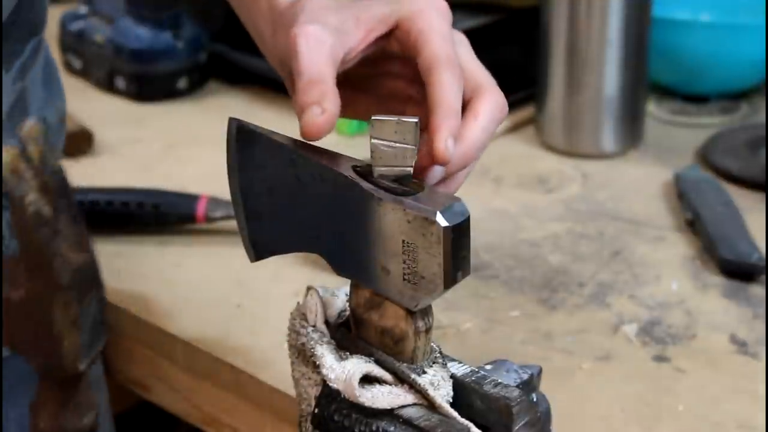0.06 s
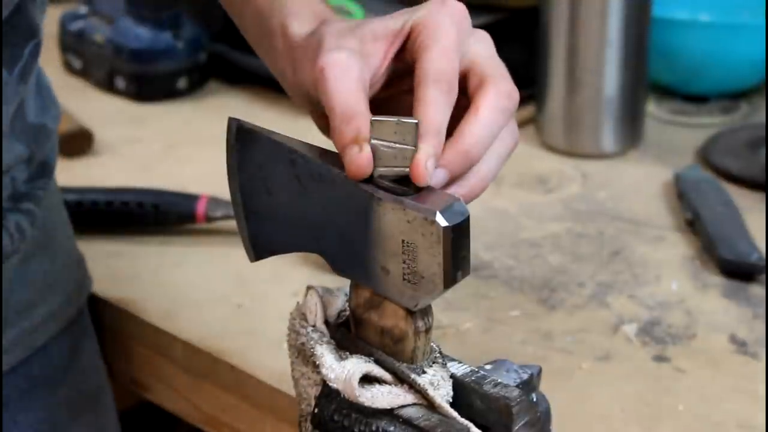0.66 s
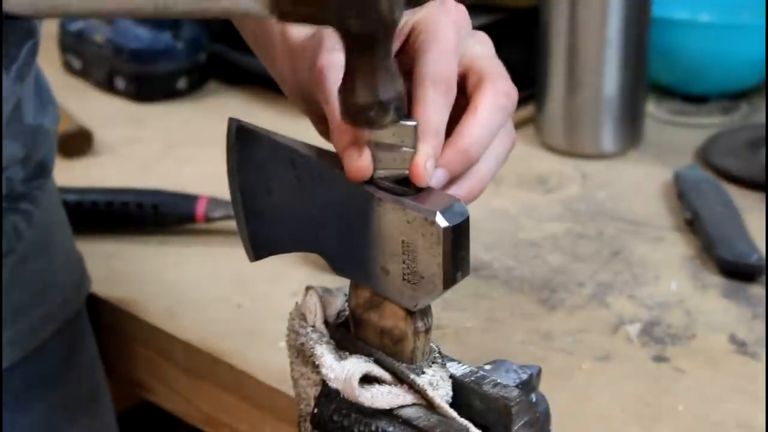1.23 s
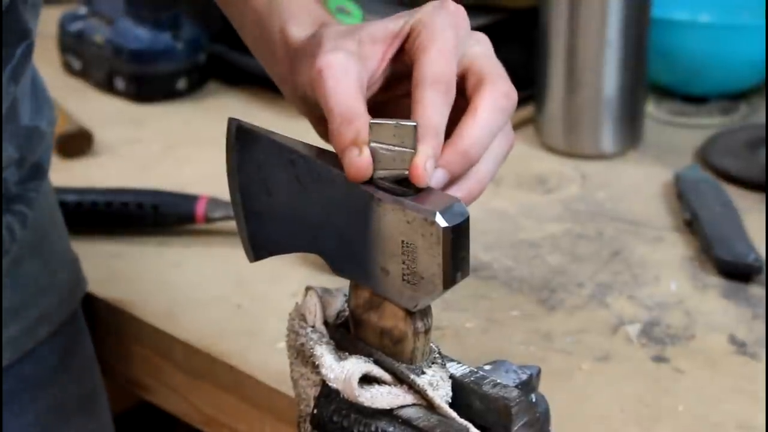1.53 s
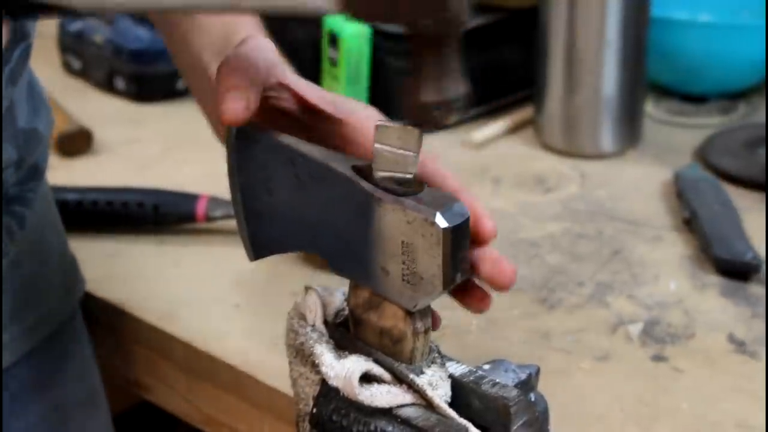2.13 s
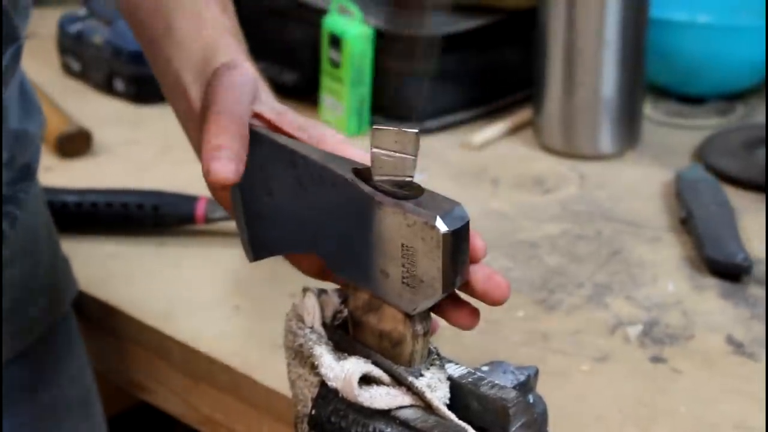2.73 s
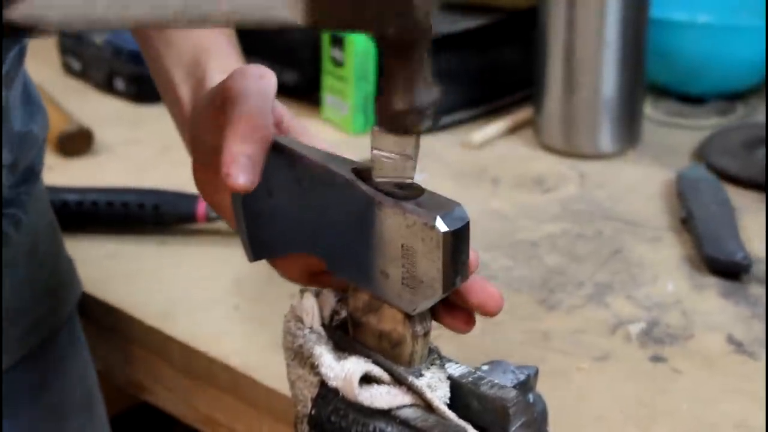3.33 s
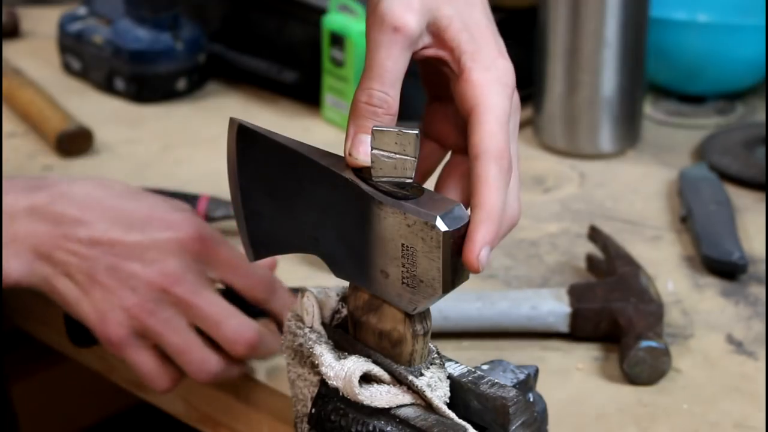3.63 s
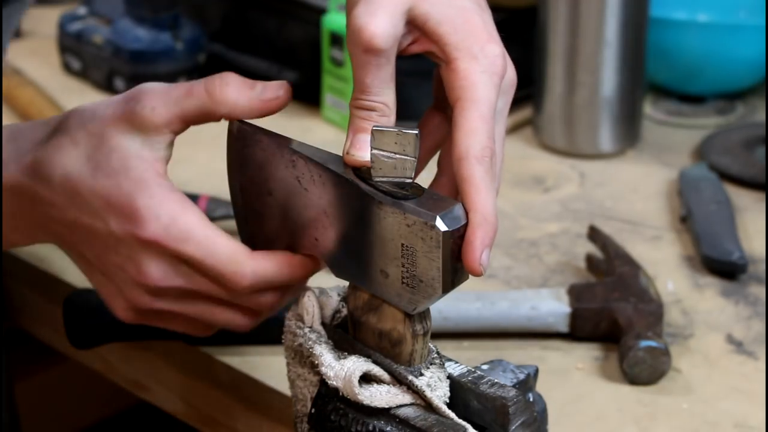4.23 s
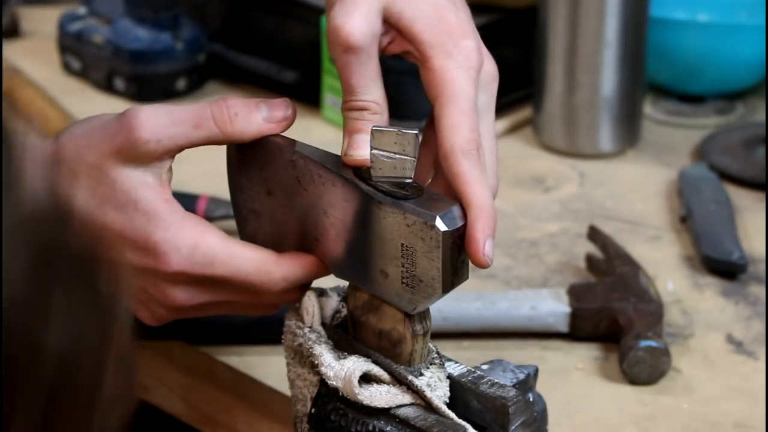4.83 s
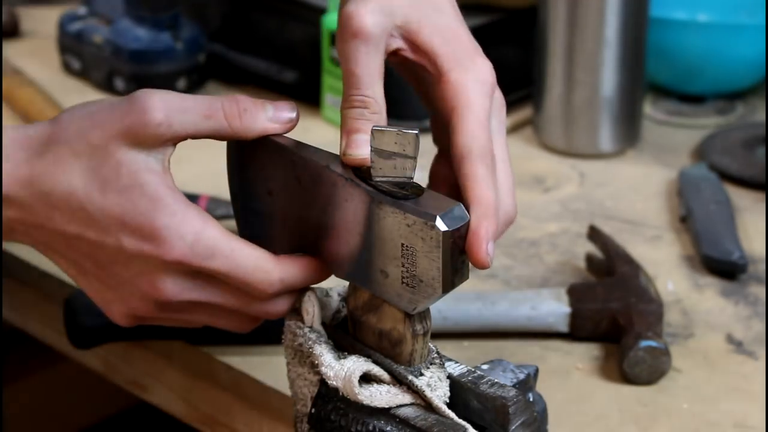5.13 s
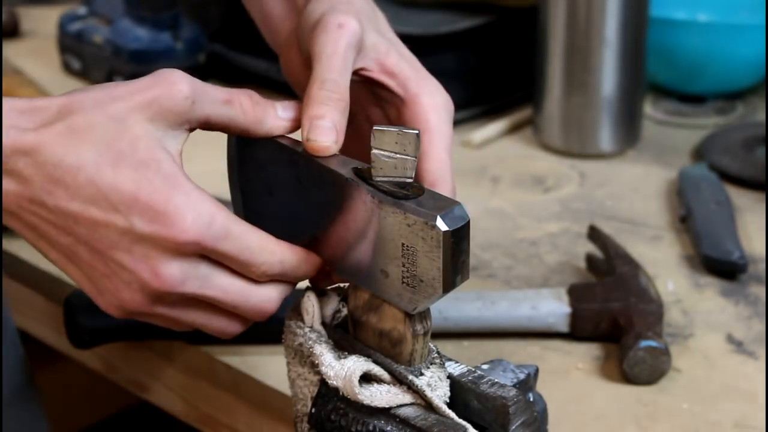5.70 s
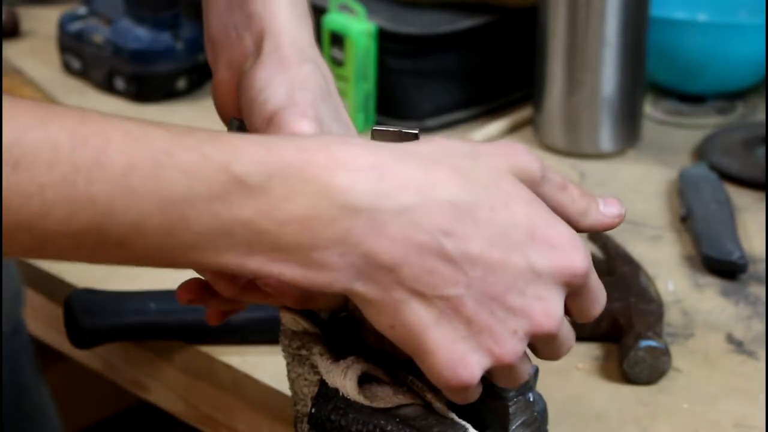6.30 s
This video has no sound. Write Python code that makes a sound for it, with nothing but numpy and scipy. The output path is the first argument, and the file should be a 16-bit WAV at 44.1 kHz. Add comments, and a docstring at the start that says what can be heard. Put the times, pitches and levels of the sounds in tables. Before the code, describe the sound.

Uneven metal-on-metal hammer strikes clack and ring in a workshop, followed by a wooden thud and a small metallic clink.

```python
"""A hammer drives a steel wedge into the handle of an axe held in a bench vise, in a hard-walled workshop.
Each blow clacks, rings the steel and thumps the bench; the first ones also split the wood.
Between the quick blows the ringing drops abruptly. The hammer falls on the bench and rocks to rest,
fingers tick on the axe head, and last the vise bar slides and clinks. Throughout, over a faint hiss,
a close microphone's limiter holds the loud hits down and lets the room swell after them."""
import sys
import numpy as np
from scipy import signal
from scipy.fft import rfft, irfft
from scipy.io import wavfile
from scipy.ndimage import uniform_filter1d, minimum_filter1d

SR = 44100
rng = np.random.default_rng(int(sys.argv[2]) if len(sys.argv) > 2 else 0)


def generate_wav(signal):
    """Clip the signal to [-1, 1] and save it as 16-bit WAV at the path in sys.argv[1]."""
    frames = np.transpose(np.atleast_2d(signal))
    scaled = np.clip(frames, -1, 1) * 32767
    pcm = np.round(scaled).astype(np.int16)
    wavfile.write(sys.argv[1], SR, pcm)


N = 280467
AGE_S = np.arange(SR) / SR  # time since a contact

# blows: (time [s], force [dB], ring re force [dB], clank re force [dB], clack tilt [dB/octave])
BLOWS = [(0.4773, 9.3, -33, -18, -0.48), (0.8741, 11, -17, -8, 7.8), (1.275, 8, -10, -8.5, 0.51),
         (1.6687, 3.5, -23, -4.5, 7), (1.8050, 3, -13.5, -5.5, -1.7), (1.9404, 7.5, -14, -3, 7.9),
         (2.0301, 17, -19, -7, 1.6), (2.1823, 14.5, -10.5, -1, 2), (2.2900, 13, -21, -6, -1.2),
         (2.4303, 21, -17, -4.5, -2.2), (2.8321, 22, -11.5, -7.5, 3), (3.2471, 4, -13.5, -1.5, 0.65),
         (3.3949, 7.1, -18, -6.5, 1.5)]
def hammer_blows(out, let_go_s=1.82, let_go_span_s=0.42, facing_db=-4.5):
    """The hammer seats the wedge; fingers steady and mute it, then let go."""
    for k, (s, force_db, ring_db, clank_db, tilt_db) in enumerate(BLOWS):
        grip = np.clip(.5 - (s - let_go_s) / let_go_span_s, 0, 1)
        contact, body = blow(force_db, ring_db, clank_db, tilt_db, grip, loose=np.exp(-k))
        room = workshop()  # the arm moves: new paths each blow
        # the wedge faces the microphone: weaker reflections
        facing = room * np.where(AGE_S < .005, 1, undb(facing_db))
        add(out, s, skip_decay(heard(contact, facing) + heard(body, room), s))


# instant of contact: (frequency [Hz], density [dB])
CRACK = [(600, 5.5), (1500, 3.5), (4000, 2), (8000, -5.5), (12000, 1.5), (16000, 4.5)]
# steel on steel: (frequency [Hz], density [dB])
CLACK = [(700, -2), (1500, -14), (2500, -7), (3500, -3), (5200, 0.5), (7000, 2.5), (8500, 1.5), (10000, -2),
         (11300, -1), (13000, -3.5), (16000, -17)]
def blow(force_db, ring_db, clank_db, tilt_db, grip, loose):
    """One blow as (contact, body); the hammer catches up with the sinking wedge and touches it twice."""
    crack = strength(burst(CRACK, t60_s=0.01, rise_s=.0001), force_db - 2.5 + 2.5 * loose)
    clack = strength(burst(CLACK, t60_s=0.049, rise_s=0.00031, tilt_db=tilt_db), force_db + 0.5)
    contact = crack + wedge(force_db + 4 - 8 * grip)
    rebound = undb(-7) * delay(contact, s=0.001153)
    head = axe_head(force_db + clank_db, force_db + ring_db)
    wood = handle_and_bench(force_db, loose)
    return contact + rebound, clack + head + delay(wood, s=0.002533)


# wedge modes: (frequency [Hz], level [dB], t60 [s])
WEDGE_MODES = [(8275, 2.5, 0.007), (7650, -8, .004), (8300, -4.5, 0.0014), (11880, -12.5, .003)]
def wedge(db, detune=.01):
    """The wedge rings, quickly damped by the wood, at a slightly new pitch each blow."""
    pitch = 1 + detune * rng.standard_normal()
    modes = [(hz * pitch, mode_db, t60_s) for hz, mode_db, t60_s in WEDGE_MODES]
    return strength(ring(modes, scatter_db=2), db)


# clank of the wedged head: (frequency [Hz], density [dB])
CLANK = [(1500, -27), (2600, -7.5), (3150, 4.5), (3500, -5), (3850, -9), (4450, 5), (5000, -31.5),
         (7000, -30.5)]
# hammer and axe modes: (frequency [Hz], level [dB], t60 [s])
STEEL_MODES = [(4377, -16.5, .45), (4610, -16, .5), (7291, -14, .35), (7639, -16, .3), (8511, 0, .34),
               (8534, -3, .25), (11222, -7, .28), (11246, -7, .22)]
def axe_head(clank_db, ring_db):
    """The head clanks briefly; the steel rings on."""
    clank = strength(burst(CLANK, t60_s=0.027, rise_s=0.0004), clank_db)
    return clank + undb(ring_db) * ring(STEEL_MODES, scatter_db=-4.0)


# splitting wood: (frequency [Hz], density [dB])
SPLIT = [(200, -14.5), (550, -4.5), (860, 11), (1200, -16), (2600, -12), (6000, -12.5), (15000, -21)]
# thud through vise and bench: (frequency [Hz], density [dB])
THUD = [(40, -9.5), (80, -7.5), (130, 3.5), (185, -2.5), (280, -1.5), (420, 3), (520, -5), (720, -6.5),
        (1100, -9.5), (1800, -14), (2500, -24.5), (5000, -47)]
# bench modes: (frequency [Hz], level [dB], t60 [s])
BENCH_MODES = [(34.2, 4, 0.54), (51.9, -6.5, 0.88), (92.6, -12.5, 0.13), (115.3, 0, 0.54),
               (133.6, -1, 0.15), (255.7, 2.5, 0.29), (281.3, 1, 0.21), (405, -2, 0.46), (418, -16, 0.29),
               (564, -4.5, 0.78), (675, -4.5, 0.054), (814.5, 4.5, 0.32)]
def handle_and_bench(force_db, loose):
    """A wedge not yet seated splits the wood; the push travels down the handle into the bench."""
    split = loose * strength(burst(SPLIT, t60_s=0.025, rise_s=.0005), force_db + 1.5)
    thud = strength(burst(THUD, t60_s=0.11, rise_s=0.002, tilt_db=0.18), force_db + 3.5)
    bench = undb(force_db - 20) * ring(BENCH_MODES, scatter_db=3)
    return split + thud + bench


# abrupt drops in the ringing: (time [s])
SKIPS_S = [1.755, 1.897, 1.997, 2.136, 2.256, 2.398, 3.336, 3.455]
def skip_decay(sound, onset_s, leap_s=.22):
    """At the first skip after its onset, a blow leaps to a later, quieter part of its decay."""
    later = [int((s - onset_s) * SR) for s in SKIPS_S if s > onset_s]
    if not later:
        return sound
    return np.hstack([sound[:, :later[0]], sound[:, later[0] + int(leap_s * SR):]])


# hammer landings: (time [s], body [dB], hard edge [dB])
LANDINGS = [(3.505, 17.5, 14.5), (3.516, 19, -3.5), (3.544, 0.5, -13), (3.562, 6.5, 14.5),
            (3.673, -17, -8.5)]
def dropped_hammer(out, room, rock_start_s=3.714, first_gap_s=.048, gap_ratio=.75):
    """The hammer bounces, then rocks to rest, each rocking contact sooner and weaker."""
    k = np.arange(6)
    gaps_s = first_gap_s * gap_ratio ** k
    times_s = rock_start_s + np.cumsum(gaps_s) - gaps_s
    rocking = zip(times_s, -4.5 - 4.5 * k, -7 - 5.5 * k)
    for s, body_db, edge_db in [*LANDINGS, *rocking]:
        add(out, s, heard(bounce(body_db, edge_db), room))


# bench-top modes: (frequency [Hz], level [dB], t60 [s])
BOARD_MODES = [(260, 1, 0.066), (295.5, 0, 0.071), (386, -3, 0.078), (473, -3, 0.05), (608, -2, 0.06),
               (710, -6, 0.04), (825, -4, 0.021), (1090, -2.5, 0.039)]
# hammer on wood: (frequency [Hz], density [dB])
KNOCK = [(40, -37), (110, -22), (300, 2), (600, 4.5), (1100, 2), (1600, -3), (2200, -7), (3200, -15),
         (5000, -23), (9000, -30.5), (15000, -47.5)]
def bounce(body_db, edge_db):
    """The board booms under a hard knock; gentle contacts are longer and duller."""
    board = ring(BOARD_MODES, scatter_db=1)
    gentle = np.clip((2 - body_db) / 10, 0, 1)
    knock = burst(KNOCK, t60_s=0.071 + 0.15 * gentle, rise_s=0.00027 + 0.0022 * gentle,
                  tilt_db=-1.5 * gentle)
    return strength(board, body_db) + strength(knock, edge_db)


# bar sliding to its stop: (time [s], level [dB], scrape t60 [s])
BAR_HITS = [(6.011, -21, 0.26), (6.022, -16.5, 0.048), (6.0259, -9, 0.043)]
# bar scrape: (frequency [Hz], density [dB])
SCRAPE = [(120, -56), (200, -26), (424, -26), (519, -18), (916, -20), (1370, -7.5), (2510, -19.5),
          (3900, -3), (4680, -4), (9230, -7.5), (10700, -16), (12600, -11), (16000, -22)]
# bar modes: (frequency [Hz], level [dB], t60 [s])
BAR_MODES = [(511, 3, 0.15), (1440, -7, 0.33), (3365, -9, 0.6), (3989, 4, 0.46), (5320, 3, 0.25),
             (7400, -5, 0.35), (9460, 2, 0.36), (9491, -7, 0.3)]
def vise_bar(out, room):
    """The loose steel bar scrapes and clinks in the vise screw."""
    for s, db, t60_s in BAR_HITS:
        clink = undb(db - 23) * ring(BAR_MODES, scatter_db=1)
        scrape = strength(burst(SCRAPE, t60_s, rise_s=0.00076), db)
        add(out, s, heard(scrape + clink, room))


# finger touches: (time [s], level [dB])
TOUCHES = [(3.903, -45), (3.984, -47), (4.082, -49.5), (4.182, -42.5), (4.243, -45), (4.382, -46)]
# finger on steel: (frequency [Hz], density [dB])
TICK = [(1000, -7), (3000, -11), (4500, -6), (5500, -4), (7200, -2), (10000, -8), (15000, -27)]
def finger_ticks(out, room):
    """Fingers tick on the axe head."""
    for s, db in TOUCHES:
        tick = strength(burst(TICK, t60_s=0.067, rise_s=0.00059), db)
        add(out, s, heard(tick, room))


# brushed axe-head modes: (frequency [Hz], level [dB], t60 [s])
PING_MODES = [(4350, -42, 0.15), (8830, -40.5, 0.16)]
def nail_ping(out, room, at_s=3.940):
    """A fingernail wakes two modes of the steel; the hand soon stills them."""
    ping = ring(PING_MODES, scatter_db=1) * attack(rise_s=.003)
    add(out, at_s, heard(ping, room))


# pushes on the bench: (time [s], level [dB])
NUDGES = [(0.019, -35), (0.299, -45), (4.619, -47.5), (5.609, -44)]
def bench_nudges(out, room):
    """A leaning body rocks only the lowest bench modes."""
    for s, db in NUDGES:
        sway = undb(db) * ring(BENCH_MODES[:3], scatter_db=0.5)
        add(out, s, heard(sway * fade(t60_s=0.48) * attack(rise_s=0.011), room))


# wall reverberation: (frequency [Hz], t60 [s], level [dB])
WALL_BANDS = [(60.4, 0.95, -0.5), (155, 0.29, 0.5), (400, 0.53, -2), (1024, 0.63, -3.5), (1900, 0.67, -3.5),
              (4150, 0.54, -9.5), (8800, 0.42, -10.5), (12000, 0.34, -12), (15800, 0.31, -18.5)]
# direct sound, left minus right: (frequency [Hz], level [dB])
BALANCE = [(500, 0), (2300, 2), (4200, 10.5), (8000, 1.5), (13000, -8.5)]
def workshop(walls_db=0, early_db=-7, left_lag_s=0.00011):
    """Response from bench to microphone: direct sound, bench-top reflections, then the walls."""
    hz, noise = bins(AGE_S), rfft(diffuse(SR))
    log_centres = np.log([row[0] for row in WALL_BANDS])
    walls = 0
    for (_, t60_s, db), share in zip(WALL_BANDS, np.eye(len(WALL_BANDS))):
        band = np.interp(np.log(hz + 1), log_centres, share)
        shape = fade(t60_s) * attack(rise_s=0.024)
        walls += undb(db) * irfft(noise * band, SR) * shape / np.linalg.norm(shape)
    shape = fade(t60_s=0.14) * (AGE_S > .001)
    early = undb(early_db) * diffuse(SR) * shape / np.linalg.norm(shape)
    lean_db = read(BALANCE, hz) / 2
    travel = np.exp(-2j * np.pi * hz * 12 / SR)
    left = undb(lean_db) * np.exp(-2j * np.pi * hz * left_lag_s)
    direct = irfft([travel * left, travel * undb(-lean_db)], SR)
    return direct * (AGE_S < .01) + early + undb(walls_db) * walls


# steady background: (frequency [Hz], density [dB])
HISS = [(15, -30.5), (25, 4), (64, -12.5), (107, -6), (160, -16), (281, -21.5), (313, -20), (631, -21),
        (684, -20.5), (1200, -25), (1570, -24), (2630, -27.5), (15500, -31)]
def hiss(rms_db=-48.5):
    """Faint hiss and rumble from all sides."""
    white = diffuse(N)
    noise = irfft(rfft(white) * undb(read(HISS, bins(white))), N)
    return undb(rms_db) * noise / noise.std()


def diffuse(size, port_gap_m=0.043):
    """Noise from all sides at two microphone ports: alike in the bass, unrelated in the treble."""
    mid, side = rng.standard_normal((2, size))
    alike = .985 * np.sinc(2 * bins(mid) * port_gap_m / 343)
    mid = rfft(mid) * np.sqrt((1 + alike) / 2)
    side = rfft(side) * np.sqrt((1 - alike) / 2)
    return irfft([mid + side, mid - side], size)


def burst(spectrum, t60_s, rise_s, tilt_db=0):
    """Countless heavily damped modes: a smooth spectrum, tilted per octave, smeared over a short decay."""
    hz = bins(AGE_S)
    phase = np.angle(rfft(rng.standard_normal(SR) * fade(t60_s) * attack(rise_s)))
    gain = undb(read(spectrum, hz) + tilt_db * np.log2(1 + hz / 100))
    return irfft(gain * np.exp(1j * phase), SR) * fade(min(4 * t60_s, .5))


def ring(modes, scatter_db):
    """Damped modes, weighted anew by each contact."""
    chance = rng.standard_normal((len(modes), 2))
    return sum(undb(db + scatter_db * a) * np.sign(b) * fade(t60_s) * np.sin(2 * np.pi * hz * AGE_S)
               for (hz, db, t60_s), (a, b) in zip(modes, chance))


def heard(x, room):
    """A contact at the two ports, gone within a second."""
    return signal.fftconvolve(x[None], room, axes=1)[:, :SR] * np.minimum(10 * (1 - AGE_S), 1)


def strength(x, db):
    """Scale a transient to the energy of 10 ms at this level."""
    return x * undb(db) / np.sqrt(np.sum(x ** 2) / (SR / 100))


def attack(rise_s):
    """Exponential rise."""
    return 1 - np.exp(-AGE_S / rise_s)


def fade(t60_s):
    """Exponential decay."""
    return np.exp(-np.log(1000) * AGE_S / t60_s)


def undb(db):
    """Decibels to gain."""
    return 10 ** (np.asarray(db) / 20)


def read(table, hz):
    """Interpolate levels over log frequency."""
    table_hz, db = np.array(table).T
    return np.interp(np.log(hz + 1e-3), np.log(table_hz), db)


def bins(x):
    """FFT frequencies of x in Hz."""
    return np.fft.rfftfreq(x.shape[-1], 1 / SR)


def delay(x, s):
    """Delay by s seconds."""
    return np.pad(x, (int(s * SR), 0))[:len(x)]


def add(out, s, sound):
    """Mix in a stereo sound at time s."""
    start = int(s * SR)
    out[:, start:start + sound.shape[1]] += sound[:, :N - start]


def scene():
    """All contacts in one room; sources nearer the microphone get weaker walls."""
    out = hiss()
    hammer_blows(out)
    dropped_hammer(out, workshop(walls_db=-6.5))
    room = workshop()
    finger_ticks(out, room)
    vise_bar(out, workshop(walls_db=-1))
    bench_nudges(out, room)
    nail_ping(out, room)
    return out


def limiter(x, ceiling_db=-11.0, ratio=8, release_db_per_s=45, sense_hz=1700, ahead_s=0.0058):
    """Ducks just ahead of sharp peaks; senses the bass only weakly."""
    sensed = signal.sosfilt(signal.butter(2, sense_hz, "high", fs=SR, output="sos"), x)
    power = uniform_filter1d(np.mean(sensed ** 2, axis=0), size=220)
    level_db = 10 * np.log10(np.maximum(power, 1e-12))
    duck_db = np.maximum(level_db - ceiling_db, 0) * (1 - 1 / ratio)
    recovery_db = release_db_per_s * np.arange(N) / SR
    gain_db = recovery_db - np.maximum.accumulate(duck_db + recovery_db)
    span = int(ahead_s * SR)
    return x * undb(uniform_filter1d(minimum_filter1d(gain_db, 2 * span), span))


def record(dry, top_hz=16000):
    """Limiter, hard clipping, low-pass."""
    clipped = np.clip(limiter(dry), -1, 1)
    return signal.sosfilt(signal.ellip(8, .2, 70, top_hz, fs=SR, output="sos"), clipped)


dry = scene()
out = record(dry)
generate_wav(out)
```